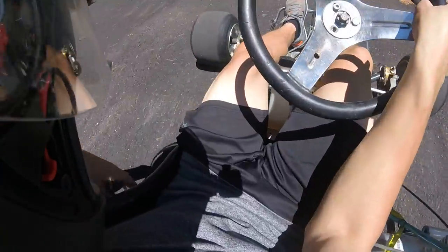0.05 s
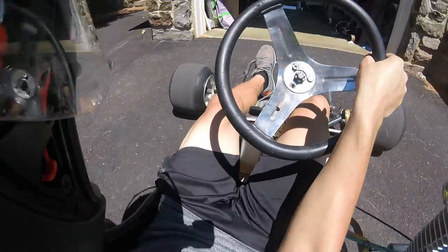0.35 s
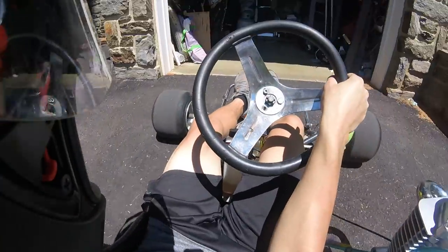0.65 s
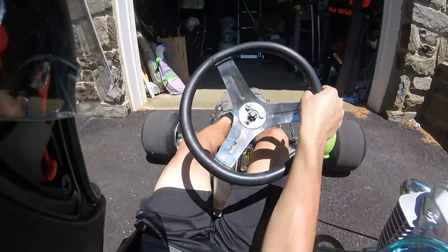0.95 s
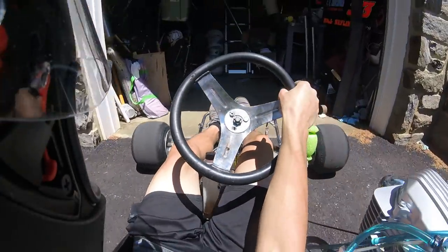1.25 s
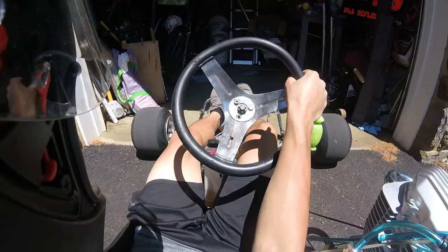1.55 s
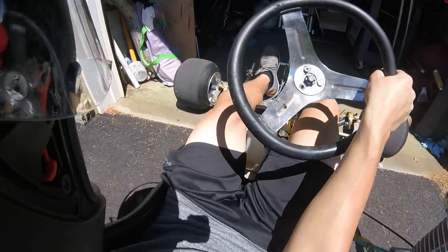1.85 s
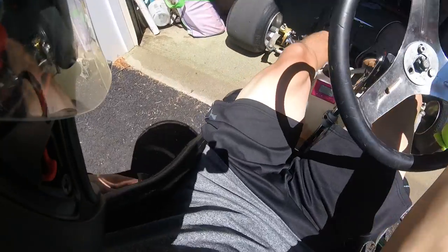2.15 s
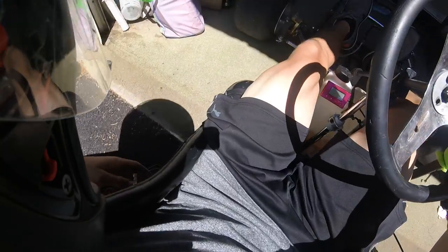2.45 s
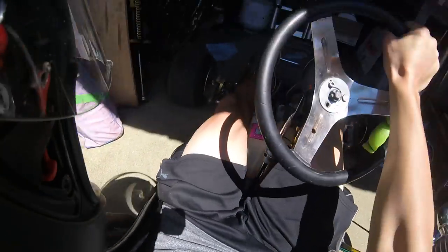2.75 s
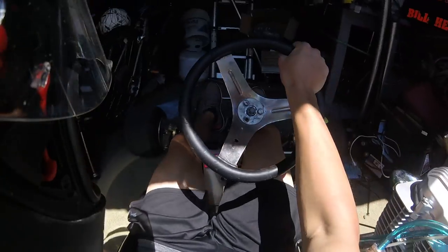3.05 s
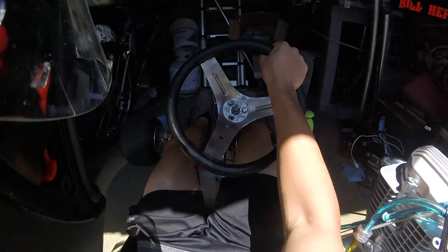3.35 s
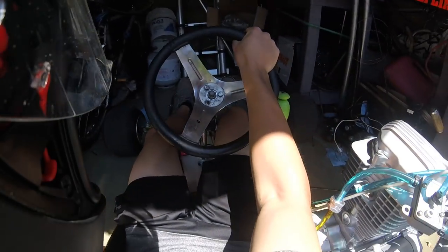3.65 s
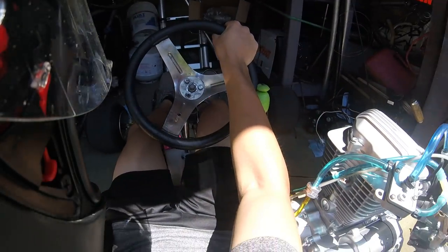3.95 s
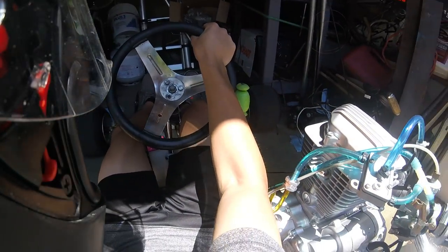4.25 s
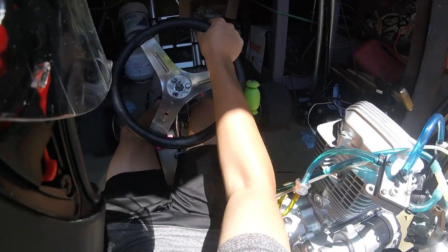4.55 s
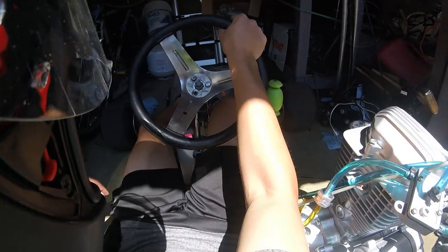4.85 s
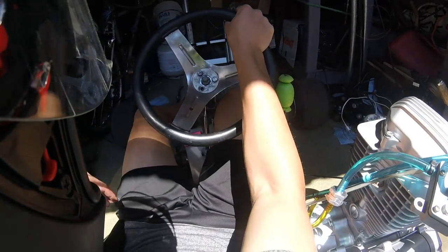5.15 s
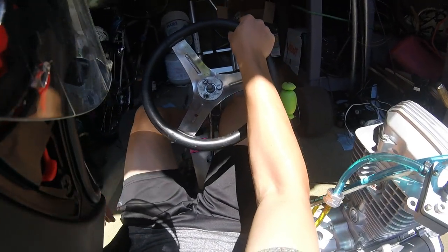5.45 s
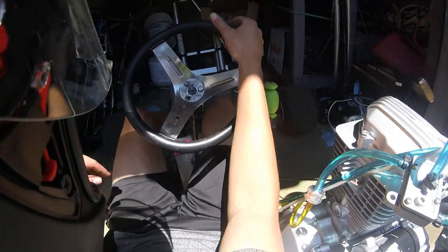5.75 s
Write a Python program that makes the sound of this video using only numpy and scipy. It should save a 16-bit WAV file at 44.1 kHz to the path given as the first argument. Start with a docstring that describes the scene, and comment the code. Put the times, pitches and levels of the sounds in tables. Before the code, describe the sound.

Rapid, uneven putting of a go-kart engine rolling into a garage, until it shuts off, clacks to rest and a pedal squeaks.

```python
"""The uneven thump of an idling single-cylinder four-stroke go-kart, heard from the driver's helmet.
Each firing rings the muffler, the intake gulps half a turn later, and chain and valve gear clatter.
The chassis knocks, and the thumps start to boom as the kart rolls into a garage. The ignition is cut
and the drive clacks to rest. Clothes rustle, a dry pedal squeaks and drops back on its stop,
and a faint bird calls over the outdoor air."""
import sys
import numpy as np
from scipy import signal
from scipy.fft import rfft, irfft
from scipy.io import wavfile
from scipy.ndimage import uniform_filter1d

SR = 44100
rng = np.random.default_rng(int(sys.argv[2]) if len(sys.argv) > 2 else 0)


def master(y):
    """Save y as 16-bit WAV."""
    cut = np.clip(np.atleast_2d(y).T, -1, 1)
    pcm = np.round(cut * 32767)  # scale
    wavfile.write(sys.argv[1], SR, pcm.astype(np.int16))


N = 255339
T = np.arange(N) / SR
FIRST_FIRING_S, IGNITION_OFF_S, IDLE_CYCLE_S = -.04, 4.25, .095

# the idle hunts, sagging and catching again: (time [s], crank speed [rpm])
IDLE_SPEED = [(0.0, 1290.0), (0.39, 1197.0), (0.5, 964.0), (0.65, 1272.0), (0.93, 1288.0), (1.13, 1097.0),
              (1.69, 1324.0), (1.74, 1129.0), (2.2, 1155.0), (2.27, 1344.0), (2.7, 1225.0), (2.75, 1126.0),
              (3.11, 1271.0), (3.21, 1188.0), (3.58, 1316.0), (4.01, 1216.0), (4.12, 1036.0), (4.3, 1011.0)]
# the way into the garage: (time [s], share of the kart inside [0-1])
KART_INSIDE = [(0, 0.14), (1.7, 0), (2.3, 0.4), (3.2, .95), (5.79, 1)]
# a last, unfired stroke of cold gas: (time [s], exhaust [dB], intake [dB], share of hot pitch [0-1])
COLD_STROKE = (4.3271, -4.5, -9.5, .86)
# exhaust and intake resonances: (hot pitch [Hz], width [Hz], gain [dB])
MUFFLER, HEADER = (85.9, 44.9, 16), (205, 23.7, 19.4)
AIRBOX, RUNNER = (101.8, 15.1, 19.13), (243.2, 35, 10.25)
# breathy rush of gas: (frequency [Hz], relative level [dB])
GAS_EQ = [(150, -16), (400, 7), (600, 4), (950, -1.5), (1300, -8), (2500, -19.5), (5000, -20), (7000, -30),
          (10000, -38.5), (14000, -66.5)]
# bright edge of struck metal: (frequency [Hz], relative level [dB])
METAL_EQ = [(1500, -21.5), (3000, -12), (3800, -10), (4500, -1), (4900, -1.5), (5300, -3.5), (5850, -3.5),
            (6400, -13.5), (7500, -19.5), (10000, -25.5), (11500, -46.5), (14000, -49)]
# standing waves of the garage: (frequency [Hz], width [Hz], gain [dB])
GARAGE_MODES = [(60.1, 2.1, -10), (137, 7.2, -18.5), (258, 24, -8.5), (665, 93, -3)]
# standing waves of its doorway: (frequency [Hz], width [Hz], gain [dB])
DOOR_MODES = [(265.4, 31, -2), (297, 37, -3.5)]
# boxy body of the engine case: (frequency [Hz], relative level [dB])
CASE_EQ = [(150, -19), (330, 7), (600, -0.5), (850, -1.5), (1050, -4.5), (1350, -1.5), (1700, -7),
           (2200, -8.5), (2800, -9), (3600, -13.5), (5000, -21.5), (9000, -42.5)]
# fader ride of the clatter: (time [s], level [dB])
CLATTER_RIDE = [(0, -40), (.45, -40.5), (.75, -39), (1.55, -38), (2.1, -40.5), (2.7, -40), (3.8, -37.5),
                (4.15, -41.5)]
# ring of the cooling fins and covers: (frequency [Hz], width [Hz], gain [dB])
FIN_MODES = [(840, 26, -7.5), (1266, 4.3, 0), (1405, 5.3, -3), (2710, 21, -7), (4840, 22, -1),
             (5803, 35, -6), (9000, 43, -0.5)]
# low bed of outdoor air: (frequency [Hz], relative level [dB])
AIR_EQ = [(18, -42), (30, -12), (70, -2.5), (148, -18), (247, -7), (311, -18.5), (577, -19.5), (691, -29),
          (827, -25), (3970, -44.5), (14000, -47)]
# the driver shifts: (time [s], half width [s], rustle [dB], low bump [dB])
DRIVER_MOVES = [(5.18, 0.053, -59, -60), (5.45, 0.06, -61, -54), (5.7, 0.054, -67, -48.5)]
# clunk of the frame: (frequency [Hz], relative level [dB])
FRAME_EQ = [(120, -8.5), (330, -0.5), (700, -1), (1050, 0.5), (1500, -10.5), (2500, -12.5), (3700, -18.5),
            (6000, -31.5), (12000, -62)]
# knocks of the chassis: (time [s], frame [dB], bright metal [dB], decay [s])
CHASSIS_KNOCKS = [(.653, -44, -32.5, .005), (.7865, -21.5, -35, 0.0042), (.939, -29.5, -45.5, 0.0056),
                  (1.342, -29.5, -42.5, 0.019), (1.386, -28.5, -38.5, 0.009), (1.668, -22.5, -32, 0.0067),
                  (4.195, -27, -29.5, 0.014), (4.2005, -23, -29, 0.0084), (4.295, -32, -54, 0.0086)]
# hard, midrange body of the drive: (frequency [Hz], relative level [dB])
DRIVE_EQ = [(200, -23), (700, -14.5), (1100, -11.5), (1380, -2), (1700, -5.5), (2050, -20.5), (2400, -14.5),
            (3500, -24), (7000, -36), (12000, -61)]
# clink of its steel parts: (frequency [Hz], relative level [dB])
STEEL_EQ = [(2000, -34), (3200, -18.5), (3750, -9.5), (4200, -11.5), (4550, -1.5), (4900, 3), (5250, -11.5),
            (5820, -7.5), (6300, -20), (7500, -30), (9100, -27.5), (11500, -56)]
# clacks of the stopping drive: (time [s], body [dB], steel [dB], decay [s])
STOP_CLACKS = [(4.5375, -17, -11.5, 0.0026), (4.6097, -16, -17, 0.0018), (4.6652, -25, -29, 0.0018)]
# hollow tock of the pedal: (frequency [Hz], relative level [dB])
PEDAL_EQ = [(120, -8), (230, -7), (340, 9), (480, -8), (680, 0.5), (950, -8.5), (1400, -6), (2500, -23),
            (3700, -17), (6000, -36), (12000, -67)]
# the pedal drops back on its stop: (time [s], pedal [dB], bright metal [dB], decay [s])
PEDAL_HITS = [(5.345, -58, -61, 0.0071), (5.384, -38.5, -55, 0.016), (5.4032, -26, -37.5, 0.0044),
              (5.72, -56, -61, 0.017)]
# distant chirps: (time [s], length [s], start pitch [Hz], end pitch [Hz], level [dB])
BIRD_NOTES = [(5.5, 0.089, 2970, 2850, -62), (5.59, 0.083, 2780, 2650, -65),
              (5.686, 0.089, 3180, 3320, -60.5)]


def undb(db):
    """Decibels to gain."""
    return 10 ** (np.asarray(db) / 20)


def unit(x):
    """Scale to rms 1."""
    return x / np.sqrt(np.mean(x ** 2))


def add(track, s, sound):
    """Mix a sound into a track at time s, which may lie before the start."""
    i = int(round(s * SR))
    sound, i = sound[max(-i, 0):], max(i, 0)
    track[i:i + len(sound)] += sound[:max(N - i, 0)]


def drift(rate_hz):
    """Smooth random modulation with a spread near 1."""
    hold = int(SR / rate_hz)
    steps = np.repeat(rng.standard_normal(N // hold + 1), hold)
    return 1.3 * uniform_filter1d(uniform_filter1d(steps, hold), hold)[:N]


def resonate(x, hz, width):
    """One resonance, gain 1 at its centre."""
    return signal.lfilter(*signal.iirpeak(hz, hz / width, fs=SR), x)


def ringing(x, modes):
    """A bank of resonances side by side."""
    return sum(undb(db) * resonate(x, hz, width) for hz, width, db in modes)


def colour(x, eq, size=2048):
    """Minimum-phase EQ through points of (frequency [Hz], level [dB])."""
    hz, db = np.transpose(eq)
    freq = np.maximum(np.arange(size // 2 + 1) * SR / size, 1)
    cepstrum = irfft(np.log(undb(np.interp(np.log(freq), np.log(hz), db))))
    cepstrum[1:size // 2] *= 2
    cepstrum[size // 2 + 1:] = 0
    impulse = irfft(np.exp(rfft(cepstrum)))[:size // 2]
    return signal.fftconvolve(x, impulse)[:len(x)]


def noise(eq):
    """Steady coloured noise at rms 1."""
    return unit(colour(rng.standard_normal(N), eq))


def puff(t, rise_s):
    """Flow through a valve that opens at t = 0: it swells and dies away."""
    u = np.maximum(t, 0) / rise_s
    return u * np.exp(-u)


def swell(t, centre, width):
    """A bell-shaped fade in and out."""
    return np.exp(-.5 * ((t - centre) / width) ** 2)


def inside(s):
    """How far the kart is inside the garage at time s, 0 to 1."""
    return np.clip(np.interp(s, *np.transpose(KART_INSIDE)), 0, 1)


def firings():
    """The engine's beat: one firing time for every two crank turns, until the ignition is cut."""
    s = T + FIRST_FIRING_S
    rpm = np.interp(s, *np.transpose(IDLE_SPEED))
    cycles = np.cumsum(rpm) / (2 * 60 * SR)
    return np.interp(np.arange(np.interp(IGNITION_OFF_S, s, cycles)), cycles, s)


def fired_strokes(intake_db_per_doubling=5, run_down_s=4.05, run_down_db=-1.5):
    """Uneven hot strokes, in rows like COLD_STROKE; a slow turn draws less air."""
    s = firings()
    scatter = rng.standard_normal((len(s), 2)).T
    rpm = np.interp(s, *np.transpose(IDLE_SPEED))
    doublings = np.log2(rpm * IDLE_CYCLE_S / (2 * 60))
    exhaust_db = .15 - .13 * inside(s) + .44 * scatter[0]
    intake_db = 1.1 + intake_db_per_doubling * doublings + .5 * scatter[1]
    intake_db += run_down_db * (s > run_down_s)
    return list(zip(s, exhaust_db, intake_db, np.ones(len(s))))


def thump(cycle_s, exhaust_db, intake_db, tuning, idle_lag_s=.0225, lift_s=.0017):
    """One puff rings the exhaust, the next the intake; a slower turn delays the second."""
    t = T[:SR // 4] - .001
    ring = lambda x, mode: undb(mode[2]) * resonate(x, mode[0] * tuning, mode[1])
    lift = lambda flow: uniform_filter1d(flow, int(lift_s * SR))  # the cam opens a valve gradually
    lag_s = idle_lag_s + .087 * (cycle_s - IDLE_CYCLE_S)
    blow = undb(exhaust_db) * lift(puff(t, rise_s=.0019))
    suck = undb(intake_db) * lift(puff(t - lag_s, rise_s=.00055))
    muffler = resonate(ring(blow, MUFFLER), MUFFLER[0] * tuning, MUFFLER[1])  # two chambers in a row
    header = tuning ** 9 * ring(blow, HEADER)  # only hot gas rings it fully
    return header - muffler + ring(suck, RUNNER) - ring(suck, AIRBOX)


def carburettor(cycle_s, scatter, base_hz=435, hoot_db=-32, sag=1.2):
    """Cylinder and inlet hoot like a bottle, rising as the piston shrinks the volume."""
    t = T[:SR // 4]
    speed = IDLE_CYCLE_S / cycle_s
    crank_s = t * speed
    top_hz = base_hz * speed ** sag * (1 + .015 * scatter[0])  # lower on a slow turn
    scoop = 1 - .4 / (1 + np.exp((crank_s - .036) / .0087))
    tone = np.sin(2 * np.pi * np.cumsum(top_hz * scoop) / SR)
    flutter = 1 + .35 * unit(resonate(rng.standard_normal(len(t)), 60, 100))
    return undb(hoot_db + 1.5 * scatter[1]) * flutter * swell(crank_s, centre=.055, width=.012) * tone


def engine(blowdown_db=-24, gulp_db=-30.5, tappet_db=-38.5, spit_db=-36.5, last_cycle_s=.34):
    """Each cycle layers a low thump and hoot, two breaths of gas and two bright valve ticks."""
    strokes = fired_strokes() + [COLD_STROKE]
    cycles_s = [*np.diff([row[0] for row in strokes]), last_cycle_s]
    thumps, gas, ticks = np.zeros((3, N))
    t = T[:SR // 8]
    scatters = rng.standard_normal((len(strokes), 6))
    for (s, exhaust_db, intake_db, tuning), cycle_s, scatter in zip(strokes, cycles_s, scatters):
        hoot = undb(intake_db - 4 * inside(s)) * carburettor(cycle_s, scatter)
        add(thumps, s - .001, thump(cycle_s, exhaust_db, intake_db, tuning) + hoot)
        add(gas, s - .004, undb(blowdown_db + 2 * exhaust_db + scatter[2]) * puff(t, rise_s=.0032))
        add(gas, s + .02, undb(gulp_db + intake_db + 2 * scatter[3]) * puff(t, rise_s=.0086))
        # the tappet takes up its play, then the first gas spits past the exhaust valve
        add(ticks, s - .012, undb(tappet_db + 2.7 * scatter[4]) * puff(t, rise_s=.002))
        add(ticks, s - .001, undb(spit_db + 1.7 * scatter[5]) * puff(t, rise_s=.0017))
    breath = gas * undb(.5 * inside(T)) * noise(GAS_EQ)
    return thumps + breath + ticks * noise(METAL_EQ)


def reverb_tail(t60_s, predelay_s, eq):
    """Dense reflections as a coloured, dying burst of noise."""
    t = T[:SR // 2]
    return colour(rng.standard_normal(len(t)) * undb(-60 * t / t60_s) * (t > predelay_s), eq)


def boom(x, t60_s=.56, wet_db=-20):
    """The thumps ring the doorway while the kart passes through it, and the whole garage once it is in."""
    share = inside(T)
    tail = reverb_tail(t60_s, predelay_s=.012, eq=[(60, .5), (150, 1), (300, 4.5), (700, 9.9), (3000, 3.5)])
    tail /= np.sqrt(t60_s * SR / np.log(10 ** 6))  # a longer decay adds no energy
    wash = undb(wet_db) * signal.fftconvolve(x, tail)[:N]
    doorway = np.sin(np.pi * share) ** 2 * ringing(x, DOOR_MODES)
    return x + share * (ringing(x, GARAGE_MODES) + wash) + doorway


def rattle(eq, rate_hz, spread_db, hiss):
    """Dense small impacts of uneven size over a smooth hiss."""
    hits = (rng.random(N) < rate_hz / SR) * rng.choice([-1, 1], N)
    sizes = undb(spread_db * np.minimum(rng.exponential(size=N), 4))
    return unit(colour(unit(hits * sizes) + hiss * rng.standard_normal(N), eq))


def clatter(case_db=-1.02, metal_db=-12, coast_s=4.37, fall_s=.057, coast_db=-10, rest_s=4.62):
    """Chain, clutch and valve gear rattle and ring the fins, hardest at each firing, then coast to rest."""
    ride_db = np.interp(T, *np.transpose(CLATTER_RIDE))
    ride_db += coast_db * np.clip((T - coast_s) / fall_s, 0, 1)
    firing_s = firings()
    cycle = np.interp(T, firing_s, np.arange(len(firing_s)))
    throb = np.cos(2 * np.pi * (cycle - .1))
    case = rattle(CASE_EQ, rate_hz=700, spread_db=2.5, hiss=1)
    case *= undb(ride_db + case_db + throb + drift(40))
    metal = rattle(METAL_EQ, rate_hz=600, spread_db=3, hiss=.9)
    metal *= undb(ride_db + metal_db + 2 * throb + 1.6 * drift(40))
    running = (case + metal) * np.clip((rest_s - T) / .08, 0, 1)  # fades out as the drive locks
    return running + ringing(running, FIN_MODES)


def garage(x, t60_s=.21, wet_db=-18):
    """Short, dull reflections from the cluttered garage, at a constant send level."""
    dull = [(150, -15), (500, 4.5), (2000, -3), (6000, -7), (12000, -14.5)]
    tail = reverb_tail(t60_s, predelay_s=.006, eq=dull)
    return x + undb(wet_db) * signal.fftconvolve(x, tail / np.sqrt(np.sum(tail ** 2)))[:N]


def outdoor_air(level_db=-51.2):
    """A soft, wavering bed of air through the open door."""
    return noise(AIR_EQ) * undb(level_db + drift(12))


def clothes(steady_db=-68, bump_hz=165, bump_width_hz=120):
    """Cloth rustles faintly throughout, and swells with a low bump whenever the driver shifts."""
    cloth = rattle(CASE_EQ, rate_hz=520, spread_db=2.5, hiss=.86)
    cloth += undb(-9.5) * rattle(METAL_EQ, rate_hz=370, spread_db=3.5, hiss=.8)
    rumble = resonate(rng.standard_normal(N), bump_hz, bump_width_hz)
    bump = unit(resonate(rumble, bump_hz, bump_width_hz))
    shifting = sum(swell(T, s, width) * (undb(cloth_db) * cloth + undb(bump_db) * bump)
                   for s, width, cloth_db, bump_db in DRIVER_MOVES)
    return (undb(steady_db) * cloth + shifting) * undb(2 * drift(30))


def strikes(blows, body_eq, metal_eq, shiver_db, shiver_s):
    """A burst of contact chatter rings a body and the bright metal on it; loose parts shiver on."""
    track, t = np.zeros(N), T[:SR // 5]
    for s, body_db, metal_db, decay_s in blows:
        for eq, db, tail_db in zip((body_eq, metal_eq), (body_db, metal_db), shiver_db):
            envelope = np.hypot(np.exp(-t / decay_s), undb(tail_db) * np.exp(-t / shiver_s))
            hit = colour(rng.standard_normal(len(t)) * envelope, eq)
            makeup_gain = np.sqrt(np.sum(envelope ** 2) / np.sum(hit ** 2))
            add(track, s, undb(db) * makeup_gain * hit)
    return track


def chassis():
    """The frame knocks and its loose metal rattles."""
    return strikes(CHASSIS_KNOCKS, FRAME_EQ, METAL_EQ, shiver_db=(-20, -13), shiver_s=.046)


def drive(start_s=4.5563, end_s=4.648, tooth_s=.008, body_db=-24.5, steel_db=-36, fade_db_per_s=39.5):
    """The drive clacks to rest, ratcheting tooth by tooth between the clacks."""
    s = np.arange(start_s, end_s, tooth_s)
    accent_db = 1.5 * rng.standard_normal((len(s), 2)).T - fade_db_per_s * (s - start_s)
    decay_s = np.full(len(s), .0015)
    teeth = zip(s, body_db + accent_db[0], steel_db + accent_db[1], decay_s)
    clacks = strikes(STOP_CLACKS, DRIVE_EQ, STEEL_EQ, shiver_db=(-15, -23), shiver_s=.018)
    return clacks + strikes(teeth, DRIVE_EQ, STEEL_EQ, shiver_db=(-22, -12), shiver_s=.011)


def pedal_squeak(start_s=5.2, start_hz=1920, sag_hz_per_s=120, level_db=-47, edge_db=-24):
    """A dry pivot squeaks on a sagging pitch, with more overtones as it rubs harder."""
    attack_s, hold_s, release_s = .072, .074, .044  # each slope spans edge_db in its time
    t = T - start_s
    hz = (start_hz - sag_hz_per_s * t) * (1 + .0046 * drift(180))
    phase = 2 * np.pi * np.cumsum(hz) / SR
    slack = np.maximum(1 - t / attack_s, 0) + np.maximum(t - attack_s - hold_s, 0) / release_s
    envelope = undb(level_db + edge_db * np.minimum(slack, 10) + drift(90))
    grip = envelope / envelope.max()
    overtones = sum(undb(db) * grip ** (k / 2) * np.sin((k + 2) * phase)
                    for k, db in enumerate((-16, -18, -35)))
    return np.sqrt(2) * envelope * (np.sin(phase) + overtones)


def pedal_stop():
    """The pedal drops back and knocks on its stop."""
    return strikes(PEDAL_HITS, PEDAL_EQ, METAL_EQ, shiver_db=(-17, -22), shiver_s=.037)


def bird(waver=.011):
    """A distant bird whistles short, gliding notes with a slight quiver."""
    track = np.zeros(N)
    for s, length_s, start_hz, end_hz, db in BIRD_NOTES:
        n = int(length_s * SR)
        hz = np.linspace(start_hz, end_hz, n) * (1 + waver * drift(310)[:n])
        add(track, s, undb(db) * np.hanning(n) * np.sin(2 * np.pi * np.cumsum(hz) / SR))
    return track


def scene():
    """Mono mix: booming engine, metalwork in a short reverb, and the quiet layers left dry."""
    metalwork = clatter() + chassis() + drive() + pedal_stop() + pedal_squeak()
    return (boom(engine()) + garage(metalwork) + outdoor_air() + bird() + clothes())[None]


def record(dry, low_hz=35, dull_hz=11500, top_hz=14300):
    """Master EQ: thin the deepest bass, dull the treble and cut the top steeply."""
    x = signal.sosfiltfilt(signal.butter(2, low_hz, "highpass", fs=SR, output="sos"), dry)
    x = signal.sosfilt(signal.butter(2, dull_hz, fs=SR, output="sos"), x)
    return signal.sosfilt(signal.ellip(10, .2, 90, top_hz, fs=SR, output="sos"), x)


dry = scene()
out = record(dry)
master(out)
```